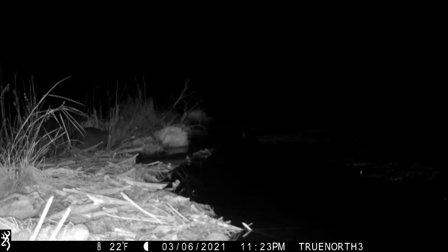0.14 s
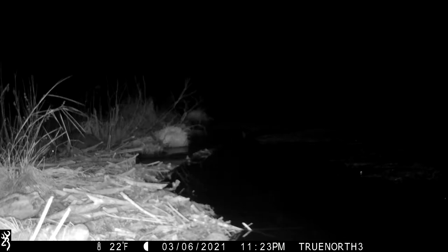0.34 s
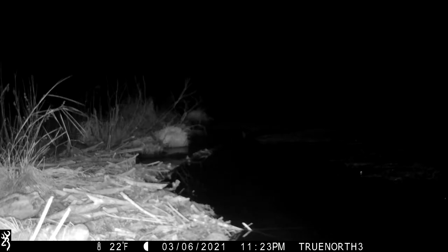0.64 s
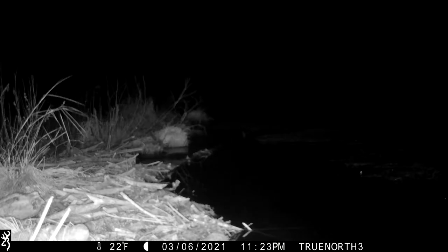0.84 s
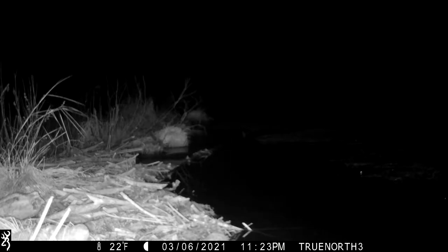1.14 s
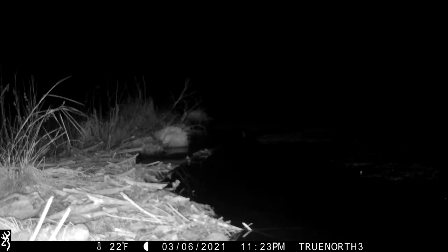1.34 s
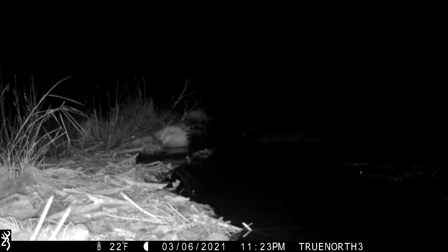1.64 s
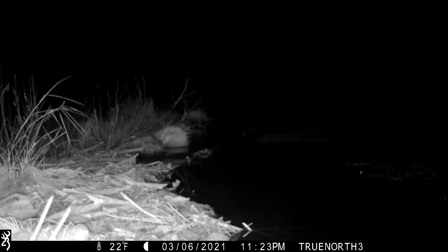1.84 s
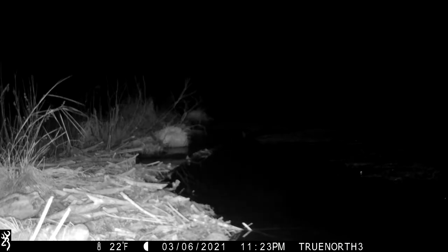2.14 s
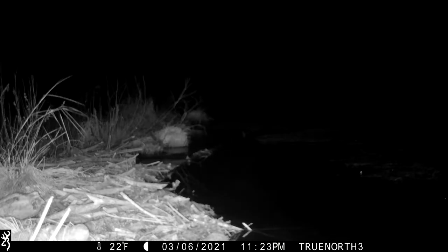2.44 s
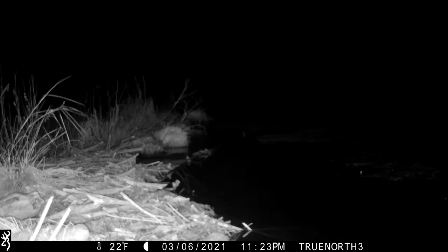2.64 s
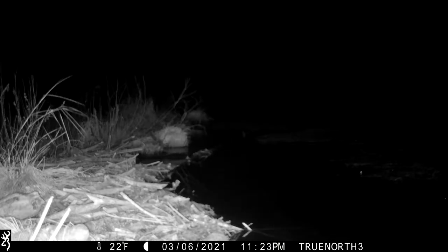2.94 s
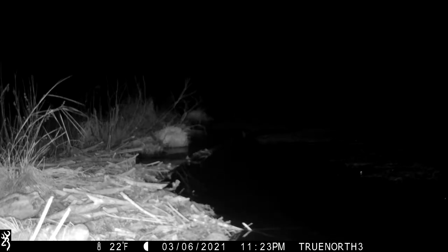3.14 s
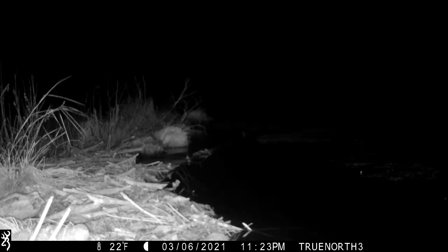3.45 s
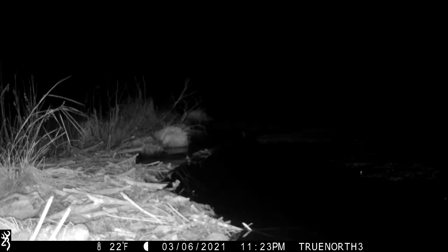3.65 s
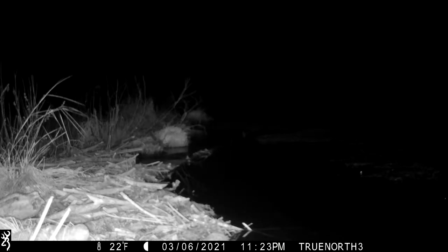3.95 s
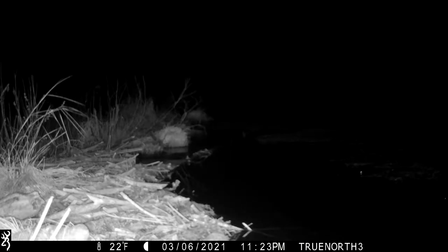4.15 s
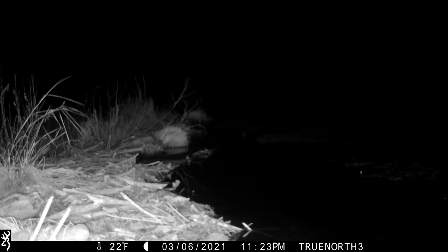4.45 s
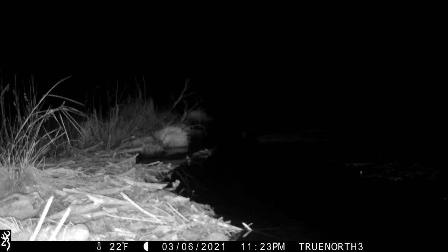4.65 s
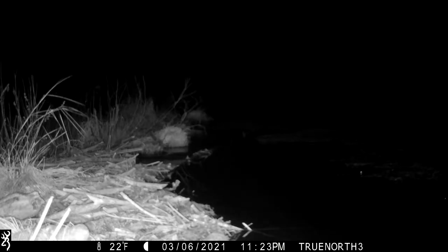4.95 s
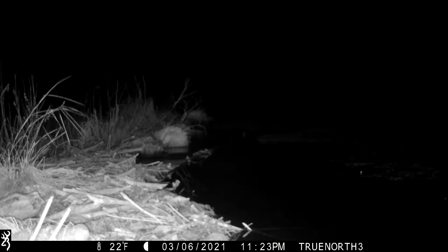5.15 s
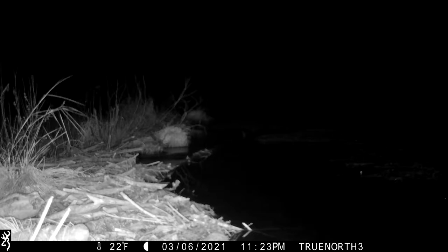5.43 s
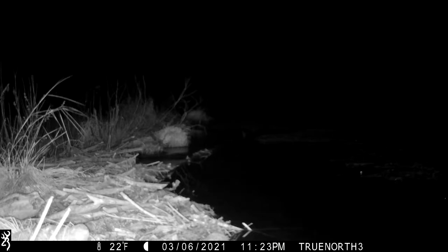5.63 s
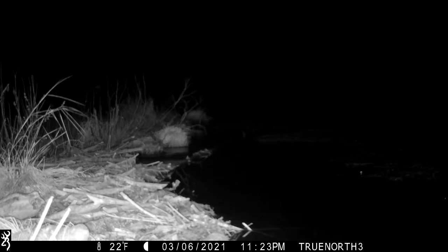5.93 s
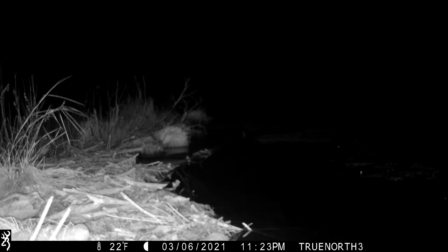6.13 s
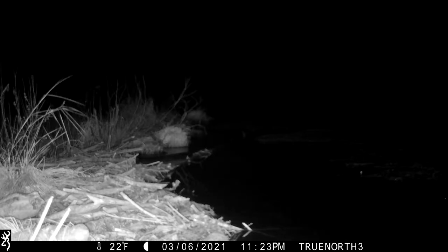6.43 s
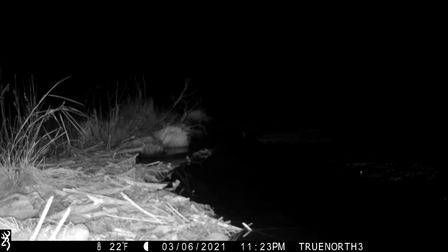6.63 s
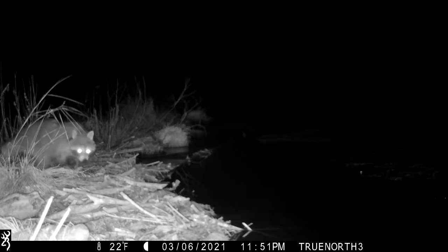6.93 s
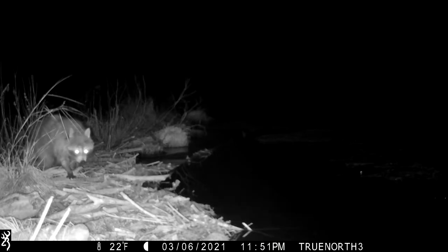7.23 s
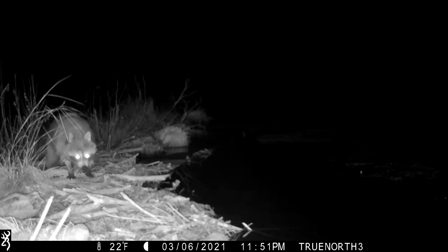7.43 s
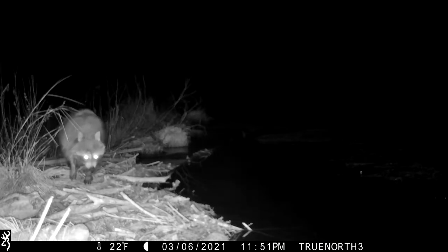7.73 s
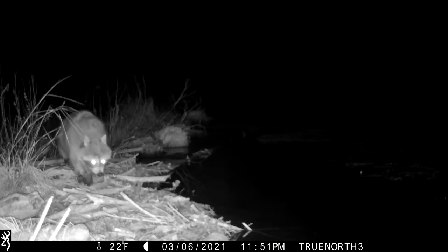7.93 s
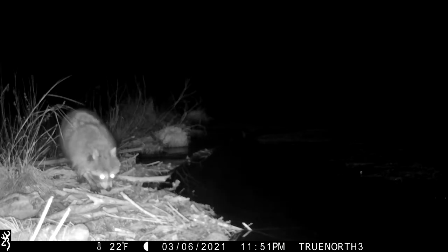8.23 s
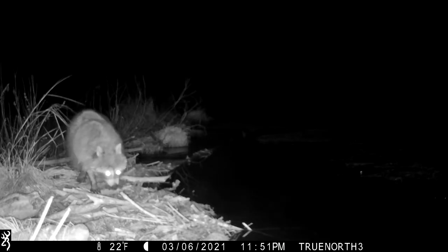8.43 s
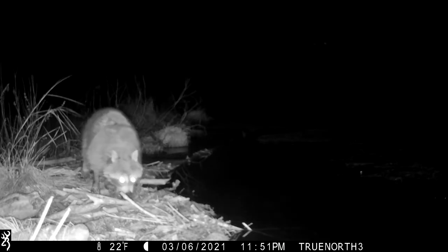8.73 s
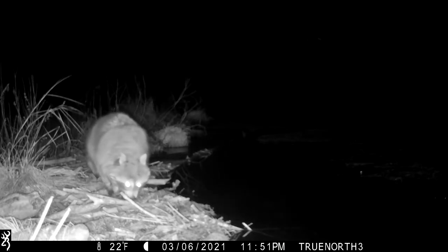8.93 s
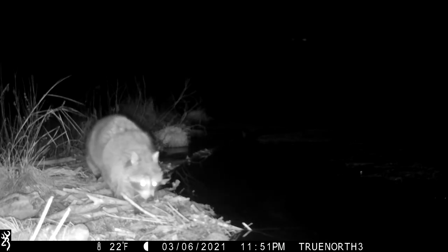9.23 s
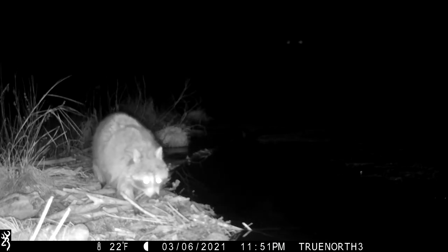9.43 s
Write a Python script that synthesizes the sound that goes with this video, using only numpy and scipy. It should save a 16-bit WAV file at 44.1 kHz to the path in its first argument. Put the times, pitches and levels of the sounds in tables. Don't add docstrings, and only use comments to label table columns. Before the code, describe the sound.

Night riverbank, small mammals close to a wildlife camera microphone, with low hiss and a very thin high whine throughout. At once a wavering squeal turns to a rasp until 0.3 s; a dry tick comes at 0.4, then quick chirps and hoarse whines. From 0.9 to 1.3 s snarls get loud and gritty, briefly overloading. Squeaky whines and yelps run to 2.2, a huff and chirps follow around 2.3-2.5, then sharp barks at 2.9, high whines and low snarls to 3.5. Bright pips pop at 3.8-4.0, then faint muttering chitters until 4.7. Loud chirps and sliding squeals come at 4.8-5.1, with tiny huffs and soft litter rustle to 5.4. After a quiet second, one last squealing burst at 6.4-6.7. A tiny dropout at 6.8, one barely audible coo near 7.1, then just hiss and sparse, small water drips from 8 to 9.4 s.

```python
import sys
import numpy as np
from scipy import signal
from scipy.fft import rfft, irfft, next_fast_len
from scipy.io import wavfile
from scipy.ndimage import uniform_filter1d

SR = 44100
rng = np.random.default_rng(int(sys.argv[2]) if len(sys.argv) > 2 else 0)


def wrap_up_sound(samples):
    columns = np.atleast_2d(samples).T
    tamed = np.clip(columns, -1, 1)
    steps = np.round(tamed * 32767).astype(np.int16)
    wavfile.write(sys.argv[1], SR, steps)


def volts(x):
    e = np.asarray(x, float) / 20
    return 10 ** e


N = 422478

# [f/Hz, density/dB]
HISS_SPECTRUM = [(15, -28), (170, -8), (580, -0.5), (1200, -0.5), (2800, -5.5), (3700, -9), (5000, -24),
                 (6500, -46.5), (8000, -67.5)]
HISS_DB = -61
WHINE_HZ, FLIPS_PER_S, WHINE_STEADY = 7788.45, 59.45, .4
FLIP_S = 6.2068, 7.0037
SCENE_CHANGE = 6.7745, 6.7955
# [start/s, stop/s, room/amplitude]
OVERLOADS = [
    (1.0883, 1.0901, 0.063),
    (1.094, 1.091, 0.16),
    (1.113, 1.116, 0.097),
    (1.118, 1.123, .1),
    (2.3, 2.318, 0.15),
    (2.89, 2.887, .17),
    (2.925, 2.931, 0.082),
    (4.921, 4.923, 0.082),
    (6.516, 6.517, 0.085),
]

# [t/s, f/Hz, peak level/dB]
DRIPS = [(7.978, 3600, -49.5), (8.08, 2020, -50.5), (8.137, 3400, -54.5), (8.16, 2720, -53),
         (8.42, 3280, -55), (8.622, 3240, -50), (8.965, 2020, -53), (9.1, 1480, -56), (9.183, 3780, -54),
         (9.315, 3160, -56), (9.385, 3510, -54.5)]
# [t/s, length/s, level/dB]
SCUFFS = [
    (2.285, .05, -56),
    (3.079, 0.059, -59),
    (5.103, .08, -65),
    (5.203, 0.067, -54.5),
    (5.305, 0.1, -59),
]
# [f/Hz, density/dB]
LITTER_SPECTRUM = [(100, -14.5), (300, 0), (900, 1), (1600, 3), (4000, -21), (7000, -80)]
# [t/s, peak level/dB]
TWIGS = [
    (0.396, -25),
]
# [f/Hz, level/dB]
BANK_SPECTRUM = [(1000, 1.5), (2500, -2.5), (3300, -0.5), (4000, -4), (8000, -14.5)]

# [t/s, f/Hz]
MOUTH = [(0.14, 2618), (0.669, 3207), (0.881, 2443), (1.091, 2878), (1.319, 3000), (1.541, 2646),
         (1.859, 2150), (1.981, 3028), (2.409, 2721), (2.95, 2947), (3.29, 2520), (3.9, 2970), (4.39, 2337),
         (4.86, 3290), (5.061, 2440), (6.44, 2696), (6.6, 3050)]
# [f/Hz, density/dB]
RASP_SPECTRUM = [(500, -38.5), (1000, -13), (1800, -5.5), (3700, -2.5), (4800, -16), (7000, -37.5),
                 (9500, -34.5), (12000, -55.5), (16000, -66.5)]
# [f/Hz, level/dB]
OVERTONES = [(4000, -11), (5500, -35.5), (6300, -33.5), (7200, -49.5), (8300, -42), (9500, -40.5),
             (11500, -50), (15000, -63.5)]
# [f/Hz, level/dB]
LIPS = [(2000, -9), (2600, -3), (3050, 1), (3350, 3.5), (3650, 2.5), (4050, -5), (4350, -13.5), (4700, -10)]
# [f/Hz, density/dB]
AIR_SPECTRUM = [(5000, -28.5), (7500, -1.5), (9500, -0.5), (11500, -14.5), (13500, -27), (16000, -37)]
# [t/s, level/dB]
TEETH = [(.22, -75), (.26, -62.5), (.32, -78), (.6, -63), (.68, -73), (.8, -83.5), (.91, -74.5), (1.3, -69),
         (1.499, -87), (4.9, -82), (4.97, -60), (5.06, -71.5)]

# [t/s, level/dB, f/Hz]
UNDERTONE = [
    (.07, -70, 890),
    (.11, -52.5, 944),
    (.2, -57.5, 830),
    (.29, -57.5, 736),
    (.32, -68, 746),
]
# [t/s, length/s, from f/Hz, to f/Hz, level/dB]
STREAKS = [(0.255, 0.034, 2050, 2130, -36.5), (0.292, 0.026, 3300, 3560, -37),
           (.6, 0.017, 3000, 2860, -37.5), (0.755, 0.058, 2900, 2880, -43), (0.89, 0.06, 3250, 3800, -39),
           (0.951, 0.033, 3600, 3200, -28), (1.028, 0.04, 2000, 2082, -31),
           (1.136, .055, 2500, 2380, -32.5), (1.582, 0.039, 2750, 3137, -29.5),
           (1.604, 0.017, 3600, 3050, -27), (1.608, 0.031, 2750, 2996, -27.5),
           (1.615, 0.02, 2350, 2270, -27), (1.986, .042, 3050, 3045, -22.5),
           (2.027, 0.019, 3400, 3580, -25.5), (2.054, .022, 2900, 3156, -34.5),
           (2.242, 0.059, 2300, 2912, -46.5), (2.406, .035, 2350, 2924, -25.5),
           (3.17, .03, 3300, 3500, -33), (3.15, .06, 1750, 1500, -45), (3.22, .035, 2900, 2010, -32.5),
           (3.325, .03, 3300, 2586, -29), (5.052, .022, 2300, 1186, -48), (1.478, .045, 3800, 2809, -37.5),
           (1.316, .01, 2600, 3796, -35.5), (.96, .04, 3000, 1995, -34), (1.16, .035, 2350, 2425, -34.5),
           (.15, .06, 3600, 2606, -42.5), (3.335, .055, 1414, 1125, -42.5), (2.492, .035, 2300, 1390, -41),
           (3.312, 0.025, 2450, 2310, -33), (3.34, 0.023, 2800, 2320, -28), (3.429, 0.038, 3650, 3460, -36),
           (5.033, 0.03, 2300, 2091, -30.5), (6.499, 0.029, 3200, 3082, -30.5),
           (1.103, 0.018, 3243, 3178, -17.5), (6.53, 0.0068, 3150, 3050, -19),
           (6.661, 0.021, 2950, 3034, -34)]
# [t/s, peak level/dB, f/Hz]
SLAPS = [(0.101, -22, 2650), (0.2659, -26, 2350), (0.2882, -30, 2540), (0.3106, -30.5, 3270),
         (0.399, -37.5, 2630), (0.9541, -17.5, 2530), (0.9573, -16, 2480), (0.9612, -13.5, 3020),
         (0.971, -20.5, 2740), (1.0277, -28, 2230), (1.037, -22, 2900), (1.0543, -16.5, 3060),
         (1.0832, -16.5, 2530), (1.1312, -12, 3050), (1.149, -29, 2560), (1.1856, -17.5, 2660),
         (1.1941, -24, 3040), (1.2767, -20, 2810), (1.2871, -14.5, 2940), (1.3067, -16, 3010),
         (1.56, -16, 1980), (1.6115, -20, 3010), (1.6308, -18, 2770), (1.6358, -19, 2830),
         (1.8542, -25.5, 2730), (1.8687, -16, 2150), (1.8877, -30, 2740), (2.2926, -31, 2830),
         (2.3033, -22, 3190), (2.3078, -21, 2990), (2.313, -18.5, 3150), (2.3179, -18.5, 2710),
         (2.3578, -26.5, 2600), (2.4097, -18, 2420), (2.4276, -16.5, 2920), (2.7494, -34.5, 2640),
         (2.7815, -21, 2450), (2.8522, -21.5, 3520), (2.858, -22.5, 3260), (3.0811, -23, 3210),
         (3.3916, -19.5, 2830), (3.4366, -27, 2890), (3.4536, -18.5, 3450), (3.8236, -15, 2980),
         (3.8625, -23, 3410), (3.8888, -20.5, 2180), (3.976, -21.5, 3510), (4.0774, -35.5, 2660),
         (4.7602, -23, 3550), (4.7963, -14.5, 3590), (4.8741, -15, 3500), (4.9204, -17, 3580),
         (4.9573, -24.5, 3560), (5.048, -26, 2420), (5.0555, -26, 2590), (6.5193, -19, 2800),
         (6.6912, -19, 3350), (6.6941, -28, 3260)]
# [t/s, glide/share of pitch]
SWOOPS = [(.472, 0.088), (.716, -.12), (.747, -.09), (1.437, -.1), (1.42, -.04), (2.405, 0.11),
          (2.956, 0.064), (3.308, -0.059), (4.996, 0.011), (5.039, -0.16), (4.818, 0.08), (4.835, 0.025),
          (4.854, .05), (6.414, 0.26), (6.436, 0.098), (.451, 0.07), (3.998, 0.033), (0.5, 0.042),
          (6.67, -0.12), (1.556, 0.082), (6.575, -0.091), (6.612, .07)]
# [t/s, width/s, depth/share of pitch]
BREAKS = [(0.075, 0.0033, 0.12), (0.137, 0.0045, 0.16), (1.319, .006, 0.26), (1.35, 0.0077, 0.21),
          (1.377, .006, .25), (1.552, .005, .15), (1.965, 0.0056, 0.14), (2.122, 0.0048, 0.21),
          (2.142, .004, 0.19), (3.11, .006, 0.27), (3.152, .005, .25), (4.879, 0.0044, 0.36),
          (4.928, .005, .1), (6.475, 0.0049, 0.37), (6.534, 0.004, 0.26)]

# [t/s, length/s, f/Hz, level/dB]
CHIRPS = [
    (.472, .021, 1790, -27),
    (.505, 0.018, 1725, -31.5),
    (.536, 0.019, 1714, -30.5),
    (2.344, .017, 1620, -39),
    (.566, 0.03, 1791, -35),
    (2.375, 0.019, 1880, -27),
    (3.998, .024, 1783, -33),
    (4.744, 0.023, 1931, -30.5),
    (4.784, 0.016, 1940, -21.5),
    (4.896, 0.028, 2026, -22),
]
# [t/s, length/s, f/Hz, level/dB]
BARKS = [
    (2.881, 0.019, 1980, -15),
    (2.919, 0.018, 1746, -16),
    (2.957, 0.016, 1850, -24.5),
]
# [t/s, length/s, f/Hz, level/dB]
YELPS = [(.686, .024, 1750, -34), (1.104, .034, 1850, -21.5), (1.887, .022, 1897, -24.5),
         (1.909, .008, 1700, -32), (2.804, .022, 1950, -32.5), (2.842, .022, 1850, -31.5),
         (1.936, .035, 1935, -26), (2.405, .043, 1787, -30), (3.268, .025, 1810, -31.5),
         (4.129, .016, 1713, -42), (4.36, .022, 1732, -52.5), (4.404, .022, 1538, -49),
         (4.533, .03, 1728, -49.5), (4.666, .022, 1750, -46.5), (6.686, .022, 1730, -36)]
# [t/s, length/s, f/Hz, level/dB]
PIPS = [
    (.72, 0.02, 1900, -33),
    (3.848, 0.017, 2080, -21),
    (3.879, 0.022, 2089, -21),
    (3.916, 0.02, 2105, -21),
    (3.954, .025, 2050, -23.5),
    (2.161, .022, 1880, -42),
]
# [t/s, length/s, f/Hz, level/dB]
COOS = [(1.437, 0.017, 1650, -45), (4.049, 0.022, 2013, -49), (4.163, 0.028, 1950, -53.5),
        (4.19, 0.015, 2152, -48), (4.247, 0.022, 1805, -50.5), (4.622, 0.029, 1750, -49.5),
        (4.286, 0.023, 1720, -49.5), (4.321, 0.039, 1710, -50.5), (4.447, 0.02, 1718, -53.5),
        (4.49, 0.03, 1550, -52.5), (4.582, 0.027, 1784, -48), (7.147, 0.019, 2020, -56)]
# [t/s, length/s, f/Hz, level/dB]
SLIDES = [
    (.451, .016, 1280, -37),
    (4.818, .017, 1530, -38),
    (4.835, .019, 1720, -26.5),
    (4.854, .028, 2000, -23),
    (4.928, .032, 1900, -26),
    (6.413, .023, 1450, -29.5),
    (6.67, .016, 1800, -29),
]
# [t/s, f/Hz, level/dB, rasp over the note/dB]
WHINES = [(0.746, 1762, -42.5, 3), (.785, 1793, -45, 7.5), (0.816, 1790, -44.5, 6.5),
          (1.38, 1970, -33, -14.5), (1.474, 1646, -42.5, 1), (1.554, 1854, -30, -5.5),
          (1.917, 1994, -21.5, -12), (1.971, 1960, -27.5, 3), (2.145, 1920, -45.5, -3.5),
          (2.45, 1835, -31.5, -1), (2.986, 2100, -25, -3), (3.016, 2203, -27, -3.5),
          (3.088, 2192, -30.5, -1), (3.108, 2143, -33, -3), (4.996, 1952, -34, 9.5),
          (6.481, 2277, -26, -15.5), (6.644, 2107, -28.5, -11)]
# [t/s, f/Hz, level/dB, rasp over the note/dB]
SLURS = [(.849, 1832, -40, -1), (1.285, 1973, -36, 7.5), (1.403, 1953, -35.5, -20.5),
         (1.42, 1873, -45, -15.5), (1.496, 1720, -30, -3), (1.514, 1735, -35.5, 2.5),
         (1.527, 1839, -26, -6), (1.546, 1687, -32, -0.5), (2.003, 2109, -31, 3.5), (2.03, 2000, -37.5, 4),
         (2.046, 2059, -33.5, -1), (2.068, 1984, -39, 1), (2.087, 2070, -53.5, -6),
         (2.122, 2030, -45, -4.5), (3.052, 2230, -34, -3.5), (6.436, 2050, -26, -10.5),
         (6.509, 2267, -25.5, -6), (6.536, 2163, -25, -15.5), (6.557, 2170, -28, -7.5),
         (6.575, 2063, -32.5, -8.5), (6.612, 2050, -40.5, 0)]
# [t/s, f/Hz, level/dB, rasp over the note/dB]
WAILS = [
    (0, 1891, -28, -9),
    (.028, 1676, -31.5, -8),
    (0.073, 1725, -28.5, -3),
    (0.114, 1813, -28.5, -1),
    (.906, 1787, -35.5, 8.5),
    (1.314, 1900, -36.5, -4),
    (1.352, 2000, -31.5, -7),
    (3.308, 1593, -33, -5),
    (4.96, 1974, -34.5, 6),
]
# [t/s, level/dB, start below full/dB]
SNARLS = [(0.138, -33, 3), (0.227, -33, -5), (.262, -34, 4), (0.294, -33, 2), (.311, -47, 0),
          (.598, -42, 1), (0.627, -41, 0), (0.872, -37, -13), (.945, -27.5, -20.5), (0.981, -29, 0),
          (1.024, -27.5, 1), (1.042, -24.5, 6), (1.07, -28, -13), (1.082, -16, 0), (1.097, -21, 0),
          (1.141, -27.5, -9), (1.171, -28.5, 2), (1.254, -28, -17.5), (1.605, -29.5, 10),
          (1.839, -25.5, -46), (2.187, -47.5, -9), (2.249, -45.5, -15), (2.486, -36.5, 0), (2.515, -50, 0),
          (3.145, -34, 0.5), (3.218, -34.5, 0), (3.238, -33.5, 0), (3.336, -30, 0), (3.383, -29, 0),
          (3.429, -28.5, -17), (5.041, -28, 0), (5.062, -35, 0)]
# [t/s, length/s, level/dB]
HUFFS = [(0.367, .028, -53), (0.406, .029, -58.5), (2.296, 0.03, -34), (2.878, .005, -30),
         (0.466, .005, -33), (2.745, .013, -46), (2.766, .025, -32), (3.79, 0.011, -37.5),
         (3.816, 0.015, -20), (4.07, .01, -52.5), (4.086, .018, -44), (4.208, .016, -46.5),
         (4.228, .02, -60), (4.267, .019, -56), (4.381, .019, -52), (4.427, .018, -55.5),
         (4.565, .016, -58), (4.603, .017, -48.5), (4.641, .023, -51.5), (4.693, .025, -51),
         (4.719, .024, -40.5), (5.076, .04, -53), (3.461, .04, -46), (5.202, .035, -56), (5.238, .03, -56),
         (5.293, .013, -54), (5.321, .03, -57.5), (5.36, .04, -59)]

# [arch/share of pitch, start below full/dB, fundamental/dB, octave/dB, rasp/dB]
CHIRP = (.25, -16, -12, 0, -13)
BARK = (.2, -15.5, -5.5, -1, -14)
YELP = (.2, -14, -7, -2, 0)
PIP = (.17, -12, 0, -3, -13)
COO = (.1, -1.5, -0.5, -19, -5)
SLIDE = (.06, -3, -10, 0, -12)
WHINE = (.04, -11, 1, -12, -3)
SLUR = (.015, -2, 1, -11, 1)
WAIL = (.03, -5.5, -2, -5, -1)
HUFF_START_DB = -5
OCTAVE_DB_PER_HZ, KNEE_HZ = 0.044, 2050
HOLD_S, LAST_S = .09, .031


def evened(x):
    return x / np.sqrt(np.mean(x ** 2))


def read(points, hz):
    f, value = np.transpose(points)
    return np.interp(np.log(hz + 1), np.log(f + 1), value)


def coloured(x, points):
    size = next_fast_len(len(x))
    gain = volts(read(points, np.fft.rfftfreq(size, 1 / SR)))
    return irfft(rfft(x, size) * gain, size)[:len(x)]


def resonate(x, hz, width_hz):
    turn = np.exp(2j * np.pi * np.cumsum(hz) / SR)
    r = np.exp(-np.pi * width_hz / SR)
    return 2 * (turn * signal.lfilter([1 - r], [1, -r], x / turn)).real


def wander(size):
    smooth = uniform_filter1d(rng.standard_normal(N), size=size)
    return evened(uniform_filter1d(smooth, size=size))


def hiss(flicker_db=1.5):
    level = volts(HISS_DB + flicker_db * wander(size=500))
    return level * evened(coloured(rng.standard_normal(N), HISS_SPECTRUM))


def whine(db=-84.0, double_db=-110):
    t = np.arange(N) / SR
    flip_s = np.where(t < SCENE_CHANGE[0], *FLIP_S)
    sign = np.sign(np.sin(np.pi * FLIPS_PER_S * (t - flip_s)))
    angle = 2 * np.pi * WHINE_HZ * t
    line = volts(db) * (sign + WHINE_STEADY) * np.sin(angle)
    return np.sqrt(2) * (line + volts(double_db) * np.sin(2 * angle))


def bank(x, near_t60=0.13, far_t60=1.0, far_db=-5):
    t = np.arange(SR) / SR
    taps = rng.choice([-1., 1.], SR) * (rng.random(SR) < 3000 / SR) * (t > .004)
    near, far = (taps * volts(-60 * t / t60) for t60 in (near_t60, far_t60))
    response = near / np.linalg.norm(near) + volts(far_db) * far / np.linalg.norm(far)
    return signal.fftconvolve(x, response)[:N]


def trickle(db=-66, per_s=4.7):
    t = np.arange(400) / SR
    out = np.zeros(N)
    for hz in np.geomspace(500, 4200, 10):
        pip = np.sin(2 * np.pi * hz * t) * np.hanning(400) * np.exp(-t / 0.00081)
        train = (rng.random(N) < per_s / SR) * rng.exponential(1, N)
        out += signal.oaconvolve(train, pip)[:N]
    return volts(db) * out


def drips(ring_s=0.0054):
    out, size = np.zeros(N), round(ring_s * SR)
    t = np.arange(size) / SR
    for s, hz, db in DRIPS:
        out[round(s * SR):][:size] += volts(db) * np.hanning(size) * np.sin(2 * np.pi * hz * t)
    return out


def scuffs(lumpy_db=2.0):
    level = np.zeros(N)
    for s, length, db in SCUFFS:
        size = round(length * SR)
        level[round(s * SR):][:size] += volts(db) * np.hanning(size)
    lumps = volts(lumpy_db * wander(size=200))
    return level * lumps * evened(coloured(rng.standard_normal(N), LITTER_SPECTRUM))


def twigs():
    out, t = np.zeros(N), np.arange(400) / SR
    for s, db in TWIGS:
        burst = rng.standard_normal(400) * np.exp(-abs(t - .001) / 0.0015)
        tick = coloured(burst, RASP_SPECTRUM)
        shape = np.hanning(400) ** .5 * np.exp(-t / 0.0034)
        out[round(s * SR):][:400] += volts(db) * shape * tick / abs(tick).max()
    return out


def undertone():
    s, db, hz = np.transpose(UNDERTONE)
    t = np.arange(N) / SR
    line = resonate(rng.standard_normal(N), np.interp(t, s, hz), width_hz=95)
    return volts(np.interp(t, s, db, -120, -120)) * evened(line)


def streaks(jitter=.04, flutter_db=1.0):
    out, shake, flutter = np.zeros(N), wander(size=70), wander(size=110)
    for s, length, from_hz, to_hz, db in STREAKS:
        at = slice(round(s * SR), round((s + length) * SR))
        u = np.linspace(0, 1, at.stop - at.start)
        hz = (from_hz + (to_hz - from_hz) * u) * (1 + jitter * shake[at])
        level = volts(db + flutter_db * flutter[at]) * np.sqrt(abs(np.sin(np.pi * u)))
        out[at] += level * np.sin(2 * np.pi * np.cumsum(hz) / SR)
    return np.sqrt(2) * out


def slaps(rise_s=0.00036, fall_s=0.0011):
    out, t = np.zeros(N), np.arange(-100, 200) / SR
    shape = np.exp(-(t / np.where(t < 0, rise_s, fall_s)) ** 2)
    for s, db, hz in SLAPS:
        out[round(s * SR) - 100:][:300] += volts(db) * shape * np.cos(2 * np.pi * hz * t)
    return out


def air(push, held, loud_db, db=-60.5):
    bared_db = np.interp(np.arange(N) / SR, *np.transpose(TEETH))
    spit_db = 1.88 * (loud_db + 21) + db
    level = uniform_filter1d(np.where(held, volts(bared_db), volts(spit_db)) * push, size=90)
    return level * evened(coloured(rng.standard_normal(N), [(2000, -72.5)] + AIR_SPECTRUM))


def half_lines(push, place, rasp_db, hz, glide, db=-5.5, drift=0.044, jitter=0.01, flutter_db=0.5):
    shake = 1 + drift * wander(size=500) + jitter * wander(size=60)
    hz = uniform_filter1d(hz * (1 + glide * place), size=200) * shake
    angle = np.pi * np.cumsum(hz) / SR
    lines = np.zeros(N)
    for half_steps, step_db in ((2, -16.0), (3, -7.0), (4, -4.5)):
        lines += volts(step_db + flutter_db * wander(size=260)) * np.sin(half_steps * angle)
    return uniform_filter1d(volts(rasp_db + db) * push, size=130) * lines


def rasps(push, rasp_db, per_s=900, spread_db=10.0, airy=0.73, chaos=.09, steady=0.72):
    hits = (rng.random(N) < per_s / SR) * volts(spread_db * np.minimum(rng.exponential(1, N), 3))
    puffs = signal.lfilter([1], [1, -np.exp(-1 / (0.00072 * SR))], hits)
    drive = (evened(puffs) + airy) * rng.standard_normal(N)
    hz = np.interp(np.arange(N) / SR, *np.transpose(MOUTH))
    low = resonate(drive, 0.7755 * hz * (1 + chaos * wander(size=500)), width_hz=210)
    high = resonate(drive, 1.164 * hz * (1 + chaos * wander(size=500)), width_hz=240)
    top = resonate(drive, 1.648 * hz * (1 + .6 * chaos * wander(size=500)), width_hz=180)
    level = uniform_filter1d(volts(rasp_db) * push, size=130)
    ring = evened(low - high + 0.21 * top + 0.092 * drive)
    swing = abs(uniform_filter1d(ring ** 2, size=70)) + 0.14
    return level * evened(coloured(ring / swing ** (steady / 2), RASP_SPECTRUM))


def slack():
    t, out = np.arange(N) / SR, np.ones(N)
    for s, width, depth in BREAKS:
        near = slice(round((s - .03) * SR), round((s + .03) * SR))
        out[near] -= depth * np.exp(-((t[near] - s) / width) ** 2)
    return out


def squeaks(push, place, rasp_db, hz, glide, arch, first_db, second_db,
            wobble=.015, rounding=1.83, flutter_db=0.4166, lean=.2):
    hoarse = 1 / (1 + volts(np.maximum(first_db, second_db) - rasp_db) ** 2)
    taut = slack()
    bow = arch * np.where(place > 0, 1.9, 1.1) * abs(place) ** 3.9
    contour = 1 + (glide + lean * arch) * place - bow
    tremble = 1 + wobble * (.5 + 3.1 * hoarse) * wander(size=70)
    hz = uniform_filter1d(hz * taut * contour, size=60) * tremble
    angle = 2 * np.pi * np.cumsum(hz) / SR

    def partial_level(db, power):
        flutter = volts(flutter_db * (3.5 + 2 * hoarse) * wander(size=120))
        return uniform_filter1d(push ** power * volts(db), size=90) * flutter

    first = partial_level(first_db, rounding)
    second = partial_level(second_db, np.where(place > 0, .45, .9))
    flare = volts(read(LIPS, 2 * hz))
    upper = sum(volts(read(OVERTONES, k * hz)) * np.sin(k * angle) for k in range(3, 8))
    upper = upper * (1 + .35 * wander(size=90))
    fundamental = taut ** 7.0 * first * np.sin(angle)
    octave = flare * second * np.sin(2 * angle)
    return np.sqrt(2) * (fundamental + octave + np.hypot(0.51 * first, second) * upper)


def breath(calls, edge_s=0.015, end_db=-17):
    push, which, place = np.zeros(N), np.full(N, -1), np.zeros(N)
    following = list(calls[1:]) + [(np.inf, 0, 0, 0)]
    for k, ((s, length, _, start_db), after) in enumerate(zip(calls, following)):
        joined = after[0] < s + length + .004
        stop = after[0] if joined else s + length
        at = slice(round(s * SR), round(stop * SR))
        t = np.arange(at.stop - at.start) / SR
        edge = min(edge_s, (stop - s) / 2)
        rise = np.clip(1 - t / edge, 0, 1)
        fall = np.clip(1 - (stop - s - t) / edge, 0, 1)
        last_db = after[3] if joined else end_db
        push[at] = volts(min(start_db, 0) * rise ** 2 + min(last_db, 0) * fall ** 2)
        which[at], place[at] = k, 2 * t / (stop - s) - 1
    return push, which, place


def syllables():
    mute = (1800, 0, 0, -120, -120)
    detached = ((CHIRPS, CHIRP), (BARKS, BARK), (YELPS, YELP), (PIPS, PIP), (COOS, COO), (SLIDES, SLIDE))
    sustained = ((WHINES, WHINE), (SLURS, SLUR), (WAILS, WAIL))
    notes = [(s, length, hz, db, 0, kind) for table, kind in detached for s, length, hz, db in table]
    notes += [(s, 0, hz, db, more_db, kind) for table, kind in sustained for s, hz, db, more_db in table]
    rows = [(s, 0, db, start_db, *mute) for s, db, start_db in SNARLS]
    for s, length, hz, db, more_db, (arch, start_db, first_db, second_db, rasp_db) in notes:
        octave_db = db + second_db + OCTAVE_DB_PER_HZ * max(hz - KNEE_HZ, 0)
        rows.append((s, length, db + rasp_db + more_db, start_db, hz, 0, arch, db + first_db, octave_db))
    rows = np.array(sorted(rows))
    gap = np.diff(rows[:, 0], append=np.inf)
    held_s = np.where(gap < HOLD_S, gap, LAST_S)
    rows[:, 1] = np.where(rows[:, 1] > 0, rows[:, 1], held_s)
    for s, glide in SWOOPS:
        rows[np.argmin(abs(rows[:, 0] - s)), 5] = glide
    rows = np.vstack([rows, [(s, length, db, HUFF_START_DB, *mute) for s, length, db in HUFFS]])
    return np.vstack([rows[np.argsort(rows[:, 0])], (np.inf, 0, -120, 0, *mute)])


def scene():
    rows = syllables()
    push, which, place = breath(rows[:-1, :4])
    rasp_db = rows[which, 2]
    animals = squeaks(push, place, rasp_db, *rows[which, 4:].T) + rasps(push, rasp_db)
    animals = animals + undertone() + streaks() + slaps()
    held = np.isin(rows[:, 0], [row[0] for row in WHINES + SLURS + WAILS + SNARLS])[which]
    loud_db = rows[:, [2, 7, 8]].max(axis=1)[which]
    animals = animals + air(push, held, loud_db)
    animals = animals + half_lines(push, place, rasp_db, *rows[which, 4:6].T)
    echo = volts(-19.0) * coloured(bank(animals), BANK_SPECTRUM)
    echo[round(SCENE_CHANGE[0] * SR):] = 0
    return (animals + echo + twigs() + trickle() + drips() + scuffs())[None]


def roll_off(x):
    return signal.sosfilt(signal.butter(12, 15700, fs=SR, output="sos"), x)


def record(dry):
    t = np.arange(N) / SR
    swing = abs(signal.hilbert(dry, next_fast_len(N))[:, :N])
    squeezed = dry / (1 + (swing / .33) ** 4) ** .25
    cut = np.zeros_like(squeezed)
    for start, stop, room in OVERLOADS:
        cut += ((t > start) & (t < stop)) * np.maximum(-squeezed - room, 0)
    bent = squeezed + 0.29 * cut
    noisy = bent + hiss() + whine() + volts(-87.0) * rng.standard_normal(N)
    coupled = signal.lfilter([1, -1], [1, -np.exp(-2 * np.pi * 13 / SR)], noisy)
    live = (t < SCENE_CHANGE[0]) | (t > SCENE_CHANGE[1])
    return roll_off(coupled * live)


dry = scene()
out = record(dry)
wrap_up_sound(out)
```